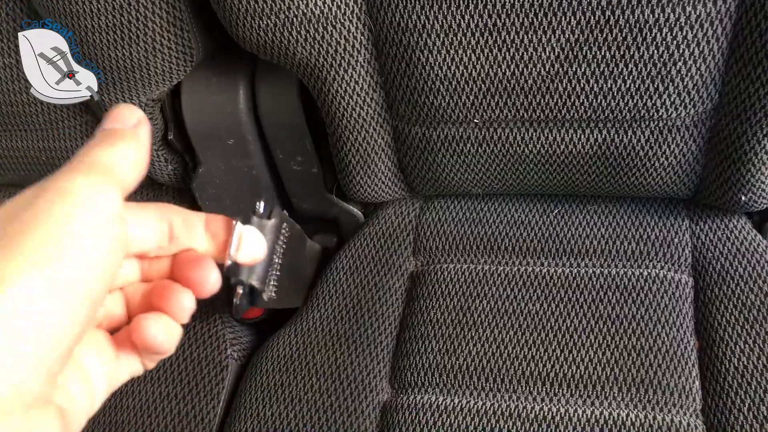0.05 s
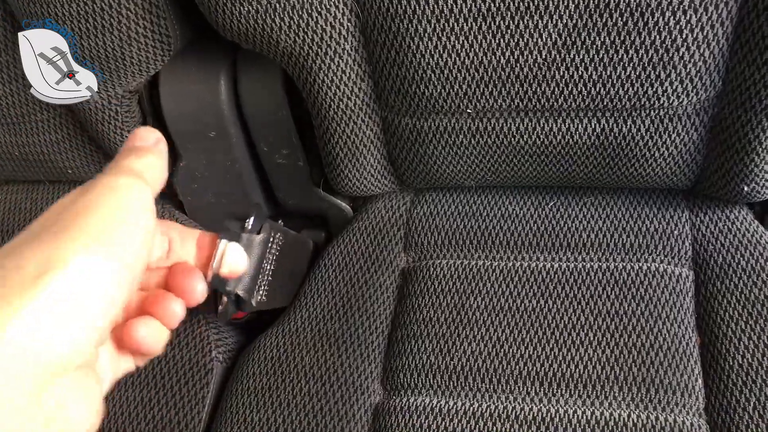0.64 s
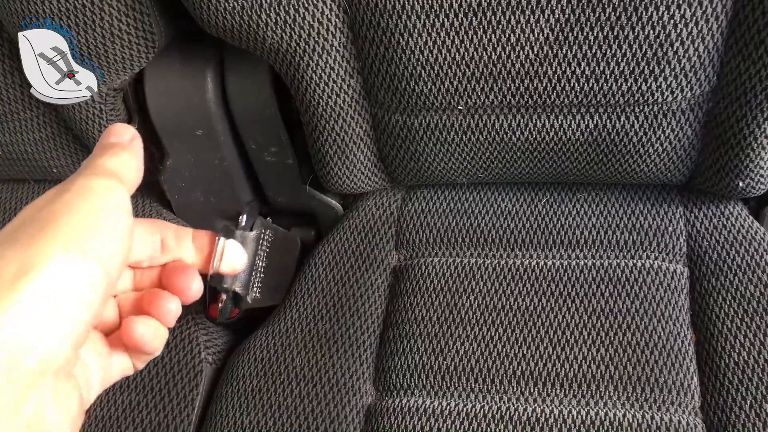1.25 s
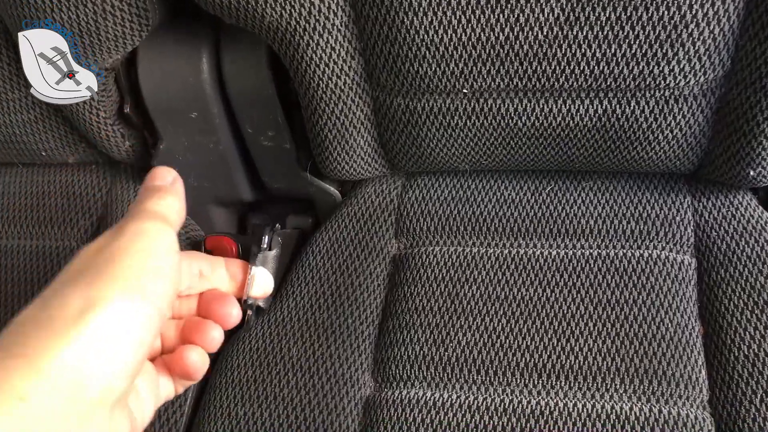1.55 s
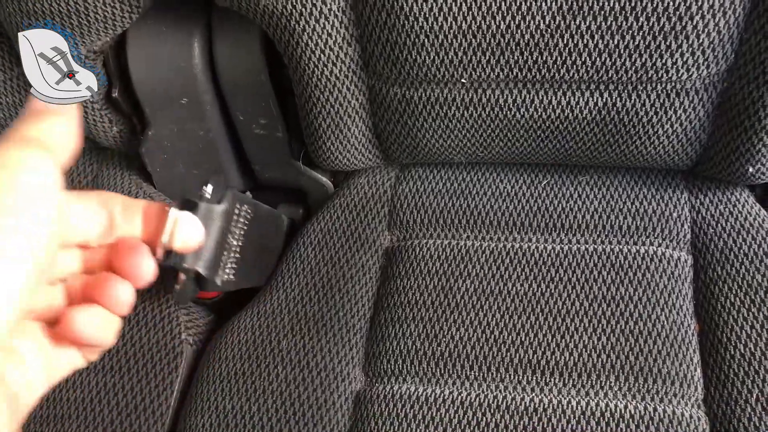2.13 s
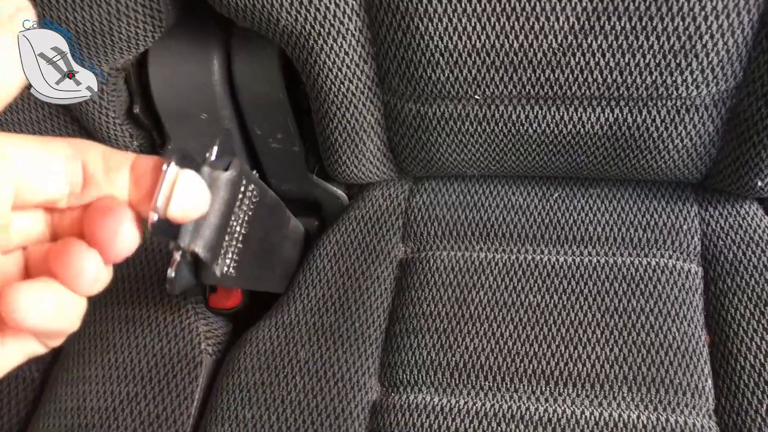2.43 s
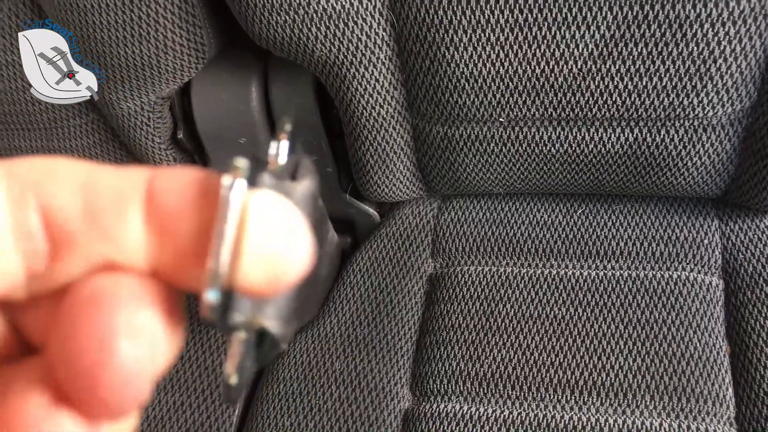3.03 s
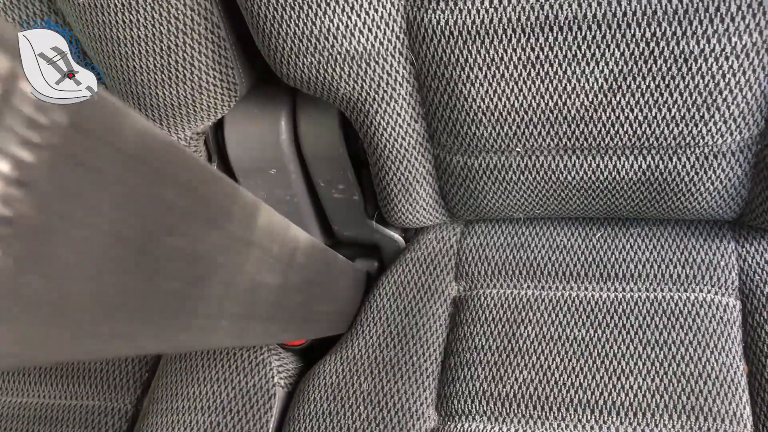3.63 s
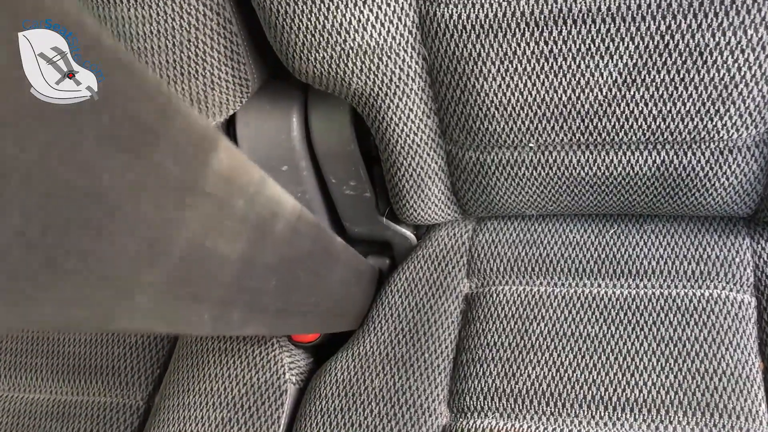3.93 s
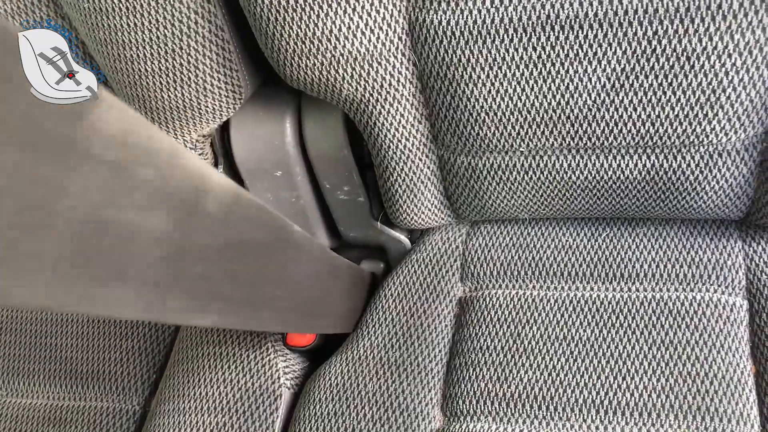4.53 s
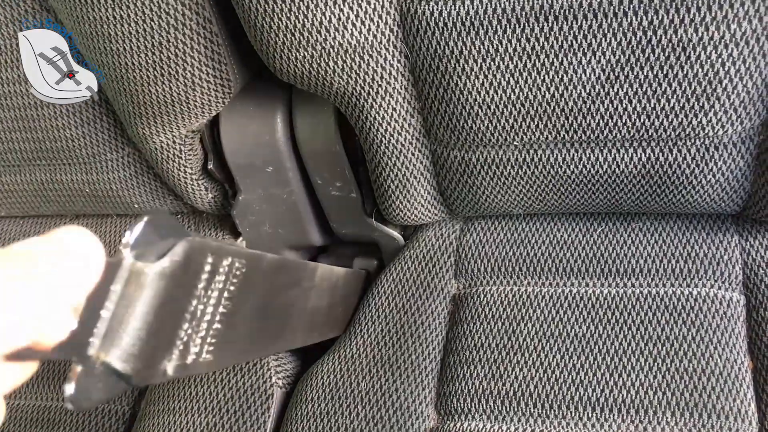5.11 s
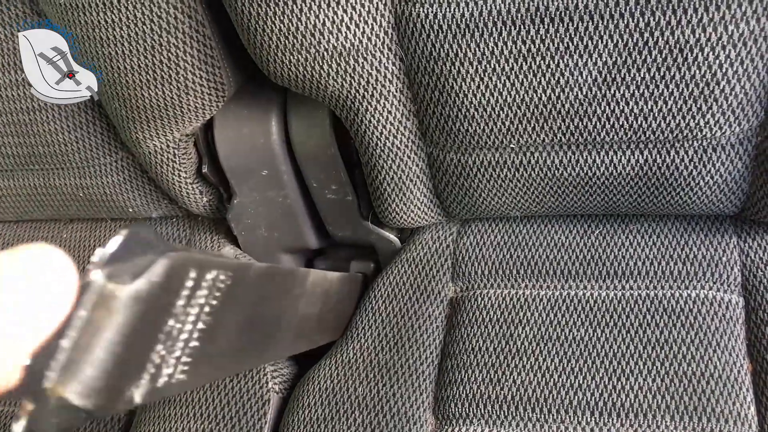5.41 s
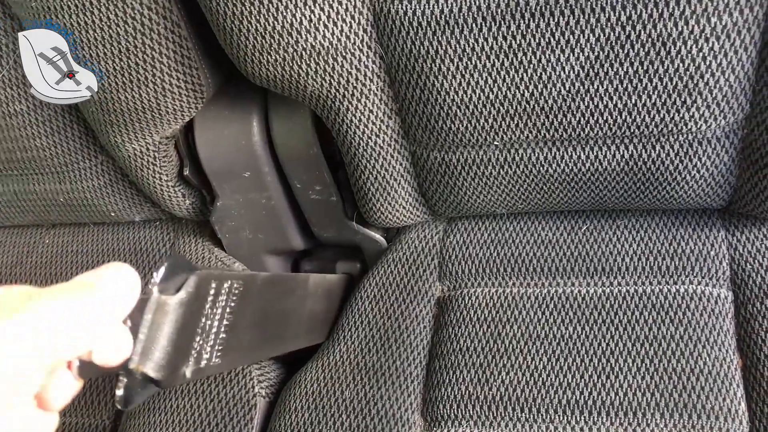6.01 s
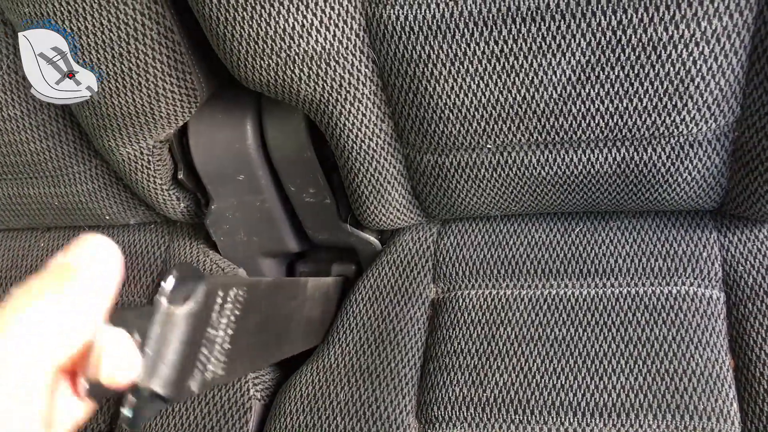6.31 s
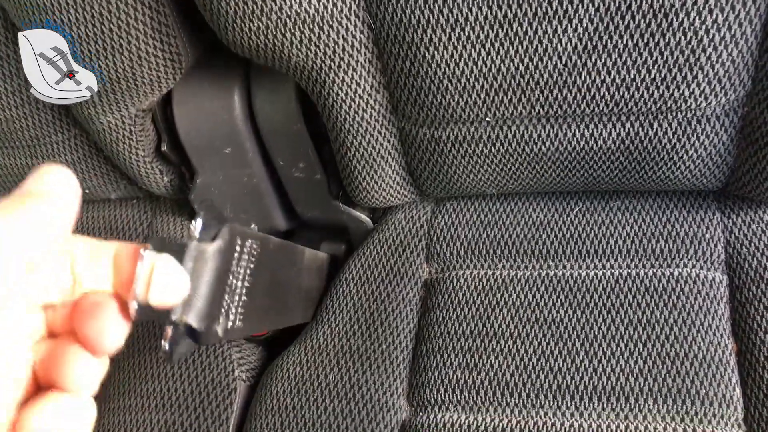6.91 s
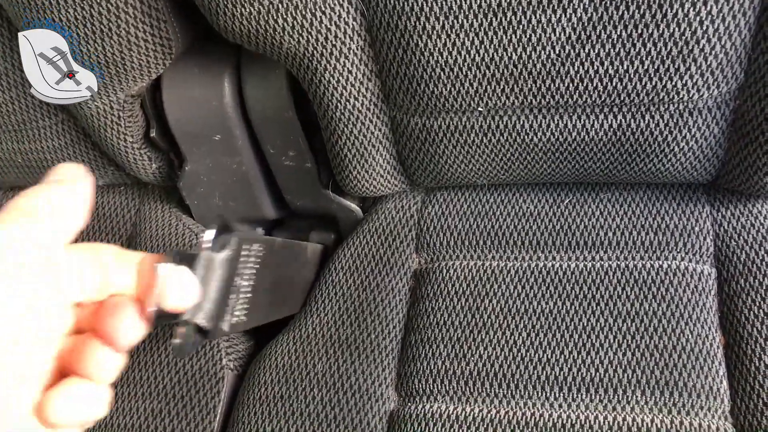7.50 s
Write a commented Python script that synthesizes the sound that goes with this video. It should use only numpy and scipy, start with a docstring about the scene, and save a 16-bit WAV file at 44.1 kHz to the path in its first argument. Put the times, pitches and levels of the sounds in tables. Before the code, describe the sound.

A seat belt's steel latch is worked by hand close to the microphone in a parked car. Low, lumpy handling rumble, faint cabin air and soft webbing hiss run throughout. Light plastic scuffs and metal ticks lead to a sharp snap at about 0.7 seconds: a bright crack, a short ring of buckle and plate, and a dull seat thump. A smaller click follows at 0.9. From 1.4 to 4.2 seconds the plate ticks irregularly against the buckle among soft, bassy hand bumps. Around 4.5 the loose catch gives a high tinkle, and the webbing rasps softly back through its guide, swelling and fading around 4.8. A second sharp snap lands at 5.3, followed by a small tinkling rattle at 5.8. The third snap comes at 6.4 and the fourth at 7.5, with light ticks between. The four snaps are by far the loudest sounds.

```python
"""A seat belt's steel latch, worked by hand close to the microphone in a parked car, snaps four times.
Each snap: the sprung catch cracks home, housing and plate ring, the seat thumps. Between snaps the
plate ticks and scuffs on the buckle, the loose catch tinkles and the hand bumps softly. Webbing hisses
as it moves and once rasps back through its guide. Handling rumble, cabin air and hiss lie underneath."""
import sys
import numpy as np
from scipy import signal
from scipy.fft import rfft, irfft
from scipy.io import wavfile

SR = 44100
rng = np.random.default_rng(int(sys.argv[2]) if len(sys.argv) > 2 else 0)


def waveform_to_disk(signal):
    """Save audio, clipped to [-1, 1], as 16-bit WAV at the path in sys.argv[1]."""
    frames = np.transpose(np.atleast_2d(signal))
    scaled = np.clip(frames, -1, 1) * 32767
    samples = np.round(scaled).astype(np.int16)
    wavfile.write(sys.argv[1], SR, samples)


N = 341774

# Table levels are relative; each source adds its own offset.
# hand draws the belt or lets it back: start_s, end_s, hiss_db, rumble_db
BELT_MOVES = [(-0.1, 0.464, -71.5, -50), (0.592, 1.0, -76, -57.5), (1.308, 1.664, -72, -49.5),
              (1.967, 2.857, -68.5, -53), (2.859, 4.392, -70, -65.5), (4.556, 5.104, -68, -53.5),
              (5.774, 6.13, -69.5, -57), (6.721, 7.166, -70, -47.5)]
# noise spectra: freq_hz, density_db
RUMBLE_SPECTRUM = [(12, -44.5), (20, -7), (35, -2.5), (52, -0.5), (90, -1.5), (115, -3), (150, -10.5),
                   (200, -12.5), (255, -22.5), (360, -27.5), (500, -31), (1000, -71)]
CABIN_SPECTRUM = [(180, -33.5), (300, 0.5), (439, -9.5), (622, -3.5), (741, -9), (883, -3.5), (1070, -10),
                  (1280, -8.5), (2180, -16.5), (3500, -24), (4550, -40.5), (7700, -120)]
HISS_SPECTRUM = [(1000, -26), (1650, 0.5), (2800, -11), (3250, -4), (3700, -4.5), (5000, -7), (6500, -5.5),
                 (7600, -9.5), (9000, -6.5), (10500, -13), (12000, -9), (14600, -14), (16000, -14)]
SCUFF_SPECTRUM = [(350, -26), (600, -4.5), (735, -11.5), (1120, 0), (2160, -1.5), (2570, -12.5),
                  (3240, -13.5), (6000, -43), (7800, -61), (13200, -120)]
TICK_SPECTRUM = [(1500, -2), (3400, 0.5), (5200, -1), (6500, -1.5), (10000, 0.5), (12800, -11.5),
                 (14700, -6), (16000, -16.5)]
SNAP_SPECTRUM = [(120, -24.5), (200, 2.5), (270, -8), (400, -5.5), (560, -11), (1000, -5.5), (1500, -15.5),
                 (1750, -12.5), (2400, -16), (3000, -8), (4400, -15.5), (7000, -16), (12000, -19.5),
                 (16000, -23.5)]
RASP_SPECTRUM = [(300, -4.5), (700, -9.5), (920, 5.5), (1120, -9.5), (1380, 0), (1600, -15), (1800, -6.5),
                 (2500, -13), (3200, -8), (3700, -14), (5200, -16), (9000, -18), (16000, -30)]
# fingers shift on the plate: start_s, end_s
FIDGETS = [(0.0, 1.7), (5.45, 7.3)]
# plate rubs on plastic: start_s, length_s, level_db
SCUFFS = [(0.09, 0.0688, -61.5), (0.24, 0.1232, -56), (0.56, 0.044, -52), (0.835, 0.0343, -60.5),
          (0.905, .085, -53.5), (1.065, 0.0637, -59.5), (4.47, 0.068, -60), (6.72, 0.11, -68.5)]
# loose catch bounces: start_s, level_db, pitch_hz
TINKLES = [(0.1378, -50, 11220), (4.4862, -30, 15000), (4.5181, -40.5, 10710), (5.1884, -50, 10300),
           (5.8202, -36.5, 10770), (5.8664, -41, 10120), (6.2854, -44, 10570), (6.9052, -52, 10780),
           (7.1048, -42.5, 10980), (7.3871, -46.5, 10450)]
# plate touches buckle: start_s, crack_db, tilt_db_per_oct, knock_db, ring_hz, ring_gain_db
TICKS = [(0.5533, -37, -10.5, -63.5, 3770, 7), (0.5715, -39, -23, -57, 3150, -5),
         (0.6432, -39.5, -2, -42, 3855, 7), (0.69, -43.5, -10.5, -69, 3280, -1),
         (0.7102, -45, -5.5, -51, 3860, 6), (0.7361, -43, -0.5, -40.5, 2850, 9),
         (0.9282, -31, -9, -37.5, 2995, 5), (1.235, -55.5, -20.5, -57.5, 2900, 5),
         (1.4985, -47, -5, -37, 4103, 6), (2.0146, -49, -0.5, -41.5, 3808, 8),
         (2.276, -30.5, -2.5, -48.5, 3774, 15), (2.4663, -37.5, -3.5, -50.5, 3953, 6.5),
         (2.7044, -39.5, 1.5, -40.5, 8320, 4), (3.0683, -36.5, -2.5, -46, 6025, 9.5),
         (3.0938, -38, -3.5, -58.5, 6107, 16.5), (3.224, -54, -4, -51.5, 2620, 5.5),
         (3.5152, -44.5, 1, -54.5, 8254, 8.5), (3.6305, -53.5, -12, -66, 3360, 8.5),
         (3.8901, -41.5, -1.5, -51, 6400, 6.5), (4.481, -36.5, 3, -37, 8470, 7),
         (4.4885, -44, 2, -34.5, 6040, 16.5), (4.5187, -38.5, 1, -36, 10470, 7),
         (4.5339, -41.5, 0, -45, 8560, 9.5), (5.1833, -48.5, 0, -47, 8290, 5.5),
         (5.2406, -48, 2, -45.5, 8320, 12), (5.254, -32.5, 3, -40.5, 4787, 7),
         (5.8042, -34.5, -1, -33.5, 8244, 8.5), (5.8106, -42.5, 0, -32, 8520, 10.5),
         (5.8206, -39, -4, -49.5, 10630, 14), (5.8373, -40.5, -10, -40, 10600, 16.5),
         (5.8688, -50.5, 3, -44, 10580, 13.5), (5.9647, -60, 2.5, -46, 3850, 5.5),
         (6.0786, -46, -8.5, -46, 2940, -6.5), (6.2727, -42.5, -1, -48, 8400, 3),
         (6.4958, -45.5, -2, -50, 3410, -8), (6.9129, -43, 1, -37, 3750, 6),
         (6.9252, -52, -0.5, -40.5, 3780, 15.5), (7.1043, -53, 3, -47.5, 11200, 5.5),
         (7.3808, -38.5, -2, -47, 8064, 6.5), (7.424, -50.5, -2.5, -46, 2736, 5),
         (7.539, -46, -3, -45.5, 3220, -1.5)]
# hand bumps: start_s, level_db, pitch_hz, knuckle_db
BUMPS = [(0.612, -33.5, 54, -43.5), (1.374, -37.5, 59, -59.5), (1.548, -34.5, 60, -59.5),
         (2.070, -28.5, 59.8, -31), (2.351, -30, 80.3, -59.5), (2.986, -35, 80.8, -30.5),
         (4.150, -32, 54.9, -66), (5.808, -33.5, 62, -48.5)]
# latch snaps: start_s, crack_db, housing_db, thump_db, plate_db, lift_db, tilt_db_per_oct, thump_hz
SNAPS = [(0.7416, -14.5, -31, -23, -64.5, 1.5, 2, 143.4),
         (5.3231, -14.5, -29.5, -25.5, -71, -3, 2.5, 127.1), (6.3844, -16, -34, -24.5, -62.5, -1, 2, 137.7),
         (7.479, -13, -31, -25, -59.5, 4.5, 5, 141)]
# snap crack and cabin tail by band: centre_hz, rise_s, crack_t60_s, tail_db, tail_t60_s
SNAP_BANDS = [(298, 0.0098, 0.056, -4.5, 0.21), (776, 0.0058, 0.017, -9, 0.14),
              (1610, 0.0019, 0.076, -3.5, .11), (3190, 0.0022, 0.0067, -15, 0.12),
              (6300, 0.002, 0.026, -13, 0.1), (13000, 0.0019, 0.006, -13, 0.053)]
# modes of buckle housing and steel plate: freq_hz, level_db, t60_s
HOUSING_MODES = [(376, -8.5, 0.071), (481.9, -3, 0.17), (684.8, -7, 0.093), (829, -8, 0.083),
                 (957.4, -3.5, 0.056), (1044.4, -7, 0.11), (1430, -10, 0.06), (1678, -11.5, 0.089),
                 (1736.7, 0, 0.059), (2215, -12, 0.12), (2378, -18.5, 0.088), (2303, -5.5, 0.065),
                 (2830.5, 3, 0.053), (2856, -3, 0.034), (3264, 1, 0.048), (3830, -7.5, 0.098),
                 (4352, 7.5, 0.024), (6260, -11.5, 0.11), (6159, 3, 0.057), (7370, -5.5, 0.032),
                 (7770, 2.5, 0.026), (8490, -12.5, 0.038), (8247, 6, 0.027), (9489, 3.5, 0.021),
                 (11135, -3.5, 0.041), (12520, -9.5, 0.048), (13000, -17.5, 0.023), (13600, -2.5, 0.027)]
PLATE_MODES = [(3850, -26, 0.48), (4081, -3.5, 0.87), (4520, -2.5, .43), (6560, 8, .27)]


def amp(db):
    return 10 ** (np.asarray(db) / 20)


def unit_rms(x):
    return x / np.sqrt(np.mean(x ** 2) + 1e-20)


def spectrum_db(spectrum, hz):
    """Interpolates on a log-frequency axis."""
    freq_hz, density_db = np.transpose(spectrum)
    return np.interp(np.log(hz + 1), np.log(freq_hz + 1), density_db)


def add(mix, start_s, sound):
    part = mix[max(round(start_s * SR), 0):][:len(sound)]
    part += sound[:len(part)]


def fade(t, t60_s):
    return np.exp(-np.log(1000) * t / np.maximum(t60_s, 1e-3))


def swell(t, rise_s):
    return 1 - np.exp(-(t / rise_s) ** 2)


def noise(spectrum, size):
    """Shaped noise, rms 1."""
    hz = np.fft.rfftfreq(size, 1 / SR)
    phases = np.exp(2j * np.pi * rng.random(len(hz)))
    return unit_rms(irfft(amp(spectrum_db(spectrum, hz)) * phases, size))


def wander(rate_hz):
    """Low-passed random drift, rms 1."""
    hz = np.fft.rfftfreq(N, 1 / SR)
    return unit_rms(irfft(rfft(rng.standard_normal(N)) / (1 + (hz / rate_hz) ** 4), N))


def ring(modes, t, spread_db):
    """Decaying modes, weighted anew by each blow."""
    return sum(amp(db + spread_db * rng.standard_normal()) * fade(t, t60_s)
               * np.sin(2 * np.pi * (hz * t + rng.random())) for hz, db, t60_s in modes)


def belt_motion(t, ramp_s=0.049):
    """Rub and shake amplitudes while the hand moves the belt."""
    rub, shake = np.zeros(N), np.zeros(N)
    for start_s, end_s, hiss_db, rumble_db in BELT_MOVES:
        moving = np.clip(np.minimum(t - start_s, end_s - t) / ramp_s + 0.5, 0, 1)
        rub += amp(hiss_db) * moving
        shake += amp(rumble_db) * moving
    return rub, shake


def handling_rumble(t, shake, floor_db=-51, press_s=0.13):
    """Lumpy rumble: follows the belt, builds before each snap and dies after it."""
    for start_s, _, _, thump_db, *_ in SNAPS:
        build = np.exp(np.minimum(t - start_s, 0) / press_s)
        decay = fade(np.maximum(t - start_s, 0), t60_s=1.8)
        shake = np.hypot(shake, amp(thump_db - 19.5) * build * decay)
    return np.hypot(amp(floor_db), shake) * noise(RUMBLE_SPECTRUM, N) * amp(4 + 1.5 * wander(rate_hz=10))


def cabin_air(rub, floor_db=-64.5, rustle_gain_db=1.5):
    """Cabin air, plus cloth rustle as the belt moves."""
    level = np.hypot(amp(floor_db), amp(rustle_gain_db) * rub)
    return level * amp(1.1 * wander(rate_hz=51)) * noise(CABIN_SPECTRUM, N)


def hiss(rub, floor_db=-72.5):
    """Faint hiss that swells as the webbing rubs."""
    return np.hypot(amp(floor_db), rub) * amp(0.77 + 0.5 * wander(rate_hz=40)) * noise(HISS_SPECTRUM, N)


def fidget(start_s, end_s, ticks_per_s=9):
    """Shifting fingers: faint stray ticks of steel on the buckle."""
    out, span_s = np.zeros(N), end_s - start_s
    for when, force, pitch in rng.random((round(ticks_per_s * span_s), 3)):
        crack_db, ring_hz = -67 + 9 * force ** 2, 3000 * 3.7 ** pitch
        tick = plate_tick(crack_db, tilt_db_per_oct=-4.5, knock_db=crack_db + 7,
                          ring_hz=ring_hz, ring_gain_db=12.5)
        add(out, start_s + when * span_s, tick)
    return out


def plate_scuff(length_s, level_db):
    """Short soft rub on plastic with uneven grip."""
    size = int(length_s * SR)
    knots = np.linspace(0, size, 24)
    grip_db = 1.5 * np.interp(np.arange(size), knots, rng.standard_normal(len(knots)))
    return amp(level_db + 3.5 + grip_db) * noise(SCUFF_SPECTRUM, size) * signal.windows.tukey(size, 0.8)


def catch_tinkle(level_db, pitch_hz, bounces=3, gap_s=0.016, step_db=-11):
    """Two close, finger-damped steel modes, struck in ever weaker scratchy bounces."""
    t, out = np.arange(2 ** 12) / SR, np.zeros(2 ** 13)
    for k in range(bounces):
        pair = ring([(pitch_hz, 0, 0.028), (1.04 * pitch_hz, -3, 0.02)], t, spread_db=4)
        grit = amp(-11) * noise([(1000, -15), (pitch_hz, 0), (16000, -6)], len(t)) * fade(t, 0.033)
        add(out, k * gap_s, amp(level_db + k * step_db) * (pair + grit) * swell(t, 0.00078))
    return out


def plate_tick(crack_db, tilt_db_per_oct, knock_db, ring_hz, ring_gain_db, corner_hz=3400):
    """Light contact on the buckle: crack with cabin tail, bright ping, soft housing knock."""
    size = 2 ** 13
    t, hz = np.arange(size) / SR, np.fft.rfftfreq(size, 1 / SR)
    tilt_db = tilt_db_per_oct * np.log2(np.maximum(hz / corner_hz, 1))
    colour_db = crack_db + spectrum_db(TICK_SPECTRUM, hz) + tilt_db
    cabin_tail = amp(-15.5) * fade(t, 0.1096)
    burst = rng.standard_normal(size) * swell(t, 0.000974) * np.hypot(fade(t, 0.02303), cabin_tail)
    crack = irfft(rfft(burst) * amp(colour_db + 8) * hz / np.hypot(hz, 1000))
    pair = ring([(ring_hz, 0, 0.024), (1.045 * ring_hz, -3, 0.018)], t, spread_db=-1.5)
    ping = amp(np.interp(ring_hz, hz, colour_db) + ring_gain_db - 5.5) * pair * swell(t, 0.00032)
    # a soft blow mainly reaches the modes near 1 kHz
    low_modes = [(mode_hz, db - 17 * abs(np.log2(mode_hz / 1040)), 0.902 * t60_s)
                 for mode_hz, db, t60_s in HOUSING_MODES if mode_hz < 2500]
    rustle = noise([(150, -13), (450, -3.5), (750, -2), (1050, -0.5), (1300, 0), (1550, -21),
                    (2200, -25.5)], size)
    knock = amp(3) * ring(low_modes, t, spread_db=1.5) + amp(-5) * rustle * fade(t, 0.1)
    return crack + ping + amp(knock_db) * knock * swell(t, 0.0037)


def hand_bump(level_db, pitch_hz, knuckle_db, knuckle_hz=190):
    """Padded push: a cycle or two of bass with a dull knuckle knock."""
    t = np.arange(2 ** 13) / SR
    push = -np.sin(2 * np.pi * pitch_hz * (t - 0.004)) * np.exp(-((t - 0.011) / 0.02) ** 2)
    knock = np.sin(2 * np.pi * knuckle_hz * t) * np.exp(-((t - 0.008) / 0.00563) ** 2)
    return (amp(level_db + 3.5) * push + amp(knuckle_db - 0.5) * knock) * swell(t, 0.00498)


def catch_crack(t, hz, gain_db):
    """Noise burst through the housing, hollow between its modes; each band has its own cabin tail."""
    resonances = [1 / np.hypot(1, (hz - mode_hz) / (35 + 0.042 * mode_hz))
                  for mode_hz, _, _ in HOUSING_MODES]
    spectrum = rfft(noise(SNAP_SPECTRUM, len(t))) * np.max(resonances, axis=0) * amp(gain_db)
    log_centres, crack = np.log([row[0] for row in SNAP_BANDS]), 0
    for share, (_, rise_s, t60_s, tail_db, tail_t60_s) in zip(np.eye(len(SNAP_BANDS)), SNAP_BANDS):
        band = irfft(spectrum * np.interp(np.log(hz + 1), log_centres, share))
        after_s = np.maximum(t - 1.65 * rise_s, 0)
        decay = np.hypot(fade(after_s, t60_s), amp(tail_db) * fade(after_s, tail_t60_s))
        crack += band * swell(t, rise_s) * decay
    return crack


def latch_snap(crack_db, housing_db, thump_db, plate_db, lift_db, tilt_db_per_oct, thump_hz, sway_hz=80):
    """Sprung catch slams home: crack, housing and plate ring, then the seat that carries them."""
    size = 2 ** 15
    t, hz = np.arange(size) / SR, np.fft.rfftfreq(size, 1 / SR)
    blow_db = tilt_db_per_oct * np.log2((hz + 1200) / 5000)
    blow_db += lift_db * np.exp(-((hz - 3400) / 900) ** 2)
    crack = catch_crack(t, hz, crack_db + blow_db)
    struck_modes = [(mode_hz, db + 0.5 * np.interp(mode_hz, hz, blow_db), t60_s)
                    for mode_hz, db, t60_s in HOUSING_MODES]
    housing = amp(housing_db) * ring(struck_modes, t, spread_db=-0.2) * swell(t, 0.0017)
    plate = amp(plate_db) * ring(PLATE_MODES, t, spread_db=-1) * swell(t, 0.002)
    push = np.sin(2 * np.pi * thump_hz * t) * swell(t, 0.014) * fade(np.maximum(t - 0.02, 0), 0.092)
    sway = amp(-4.5) * np.sin(2 * np.pi * sway_hz * t) * swell(t, 0.025) * fade(t, 0.26)
    return crack + housing + plate + amp(thump_db) * (push + sway)


def webbing_rasp(t, peak_s=4.77, peak_db=-52.5, rise_db_per_s=54.5, fall_db_per_s=72.5):
    """Weave rasps through its guide as the belt runs back, speeding up, then slowing."""
    level_db = peak_db + np.minimum(rise_db_per_s * (t - peak_s), fall_db_per_s * (peak_s - t))
    return amp(level_db + 1.5 * wander(rate_hz=160)) * noise(RASP_SPECTRUM, N)


def scene():
    """All sources, mono."""
    t = np.arange(N) / SR
    rub, shake = belt_motion(t)
    mix = handling_rumble(t, shake) + cabin_air(rub) + hiss(rub) + webbing_rasp(t)
    for table, source in ((TICKS, plate_tick), (TINKLES, catch_tinkle),
                          (BUMPS, hand_bump), (SCUFFS, plate_scuff)):
        for start_s, *row in table:
            add(mix, start_s, source(*row))
    for start_s, *row in SNAPS:
        add(mix, start_s - 0.001, latch_snap(*row))
    return (mix + sum(fidget(*span) for span in FIDGETS))[None]


def record(dry, low_cut_hz=27, band_limit_hz=15950):
    """Microphone low cut, then band limit."""
    hz = np.fft.rfftfreq(N, 1 / SR)
    cut = irfft(rfft(dry) * hz ** 4 / (hz ** 4 + low_cut_hz ** 4), N)
    lowpass = signal.firwin(255, band_limit_hz, window=("kaiser", 8), fs=SR)
    return signal.oaconvolve(cut, lowpass[None], "same", axes=1)


dry = scene()
out = record(dry)
waveform_to_disk(out)
```